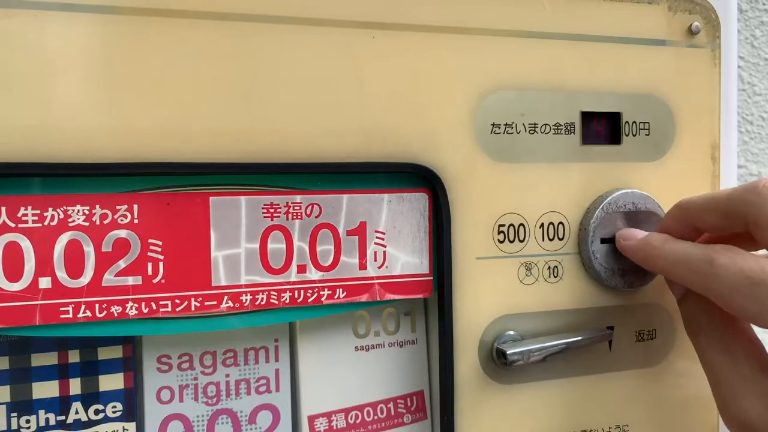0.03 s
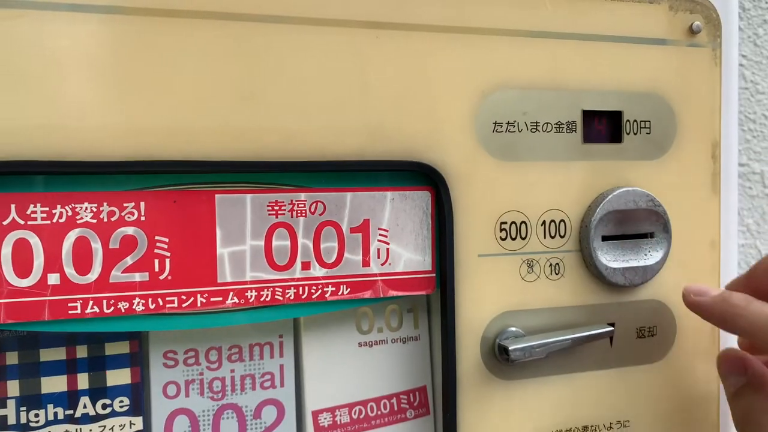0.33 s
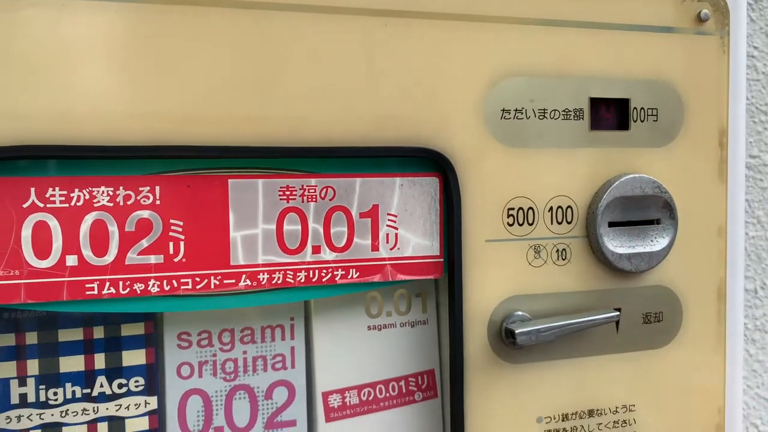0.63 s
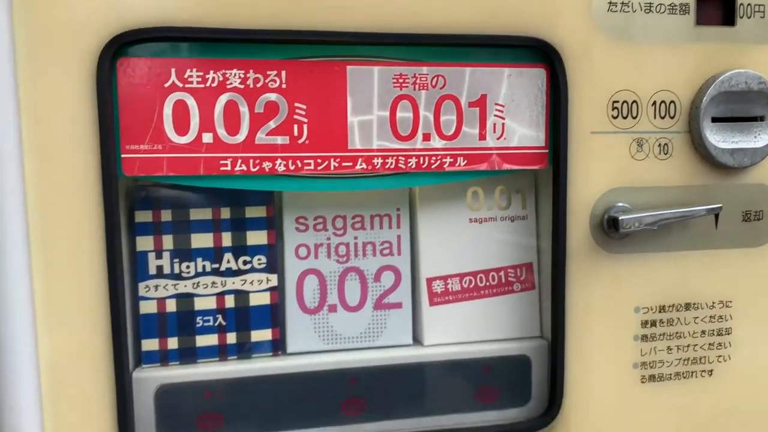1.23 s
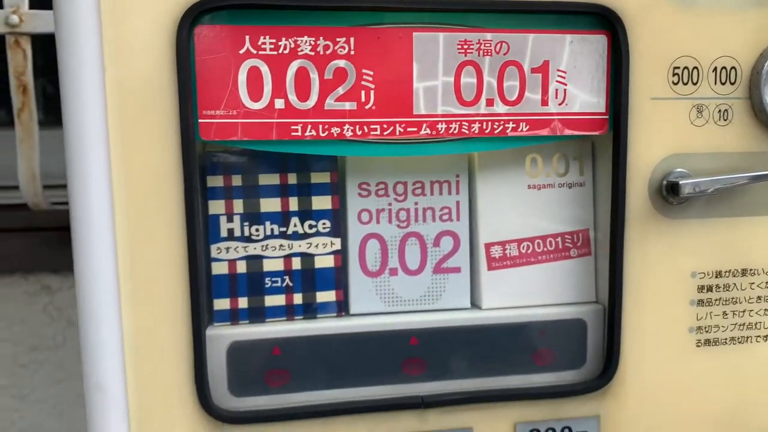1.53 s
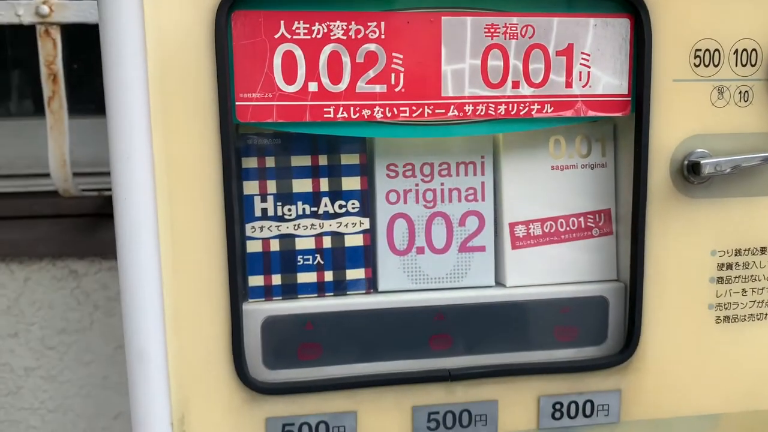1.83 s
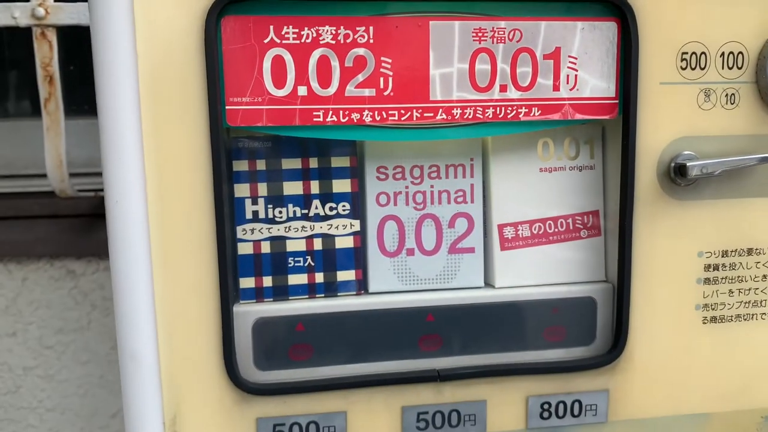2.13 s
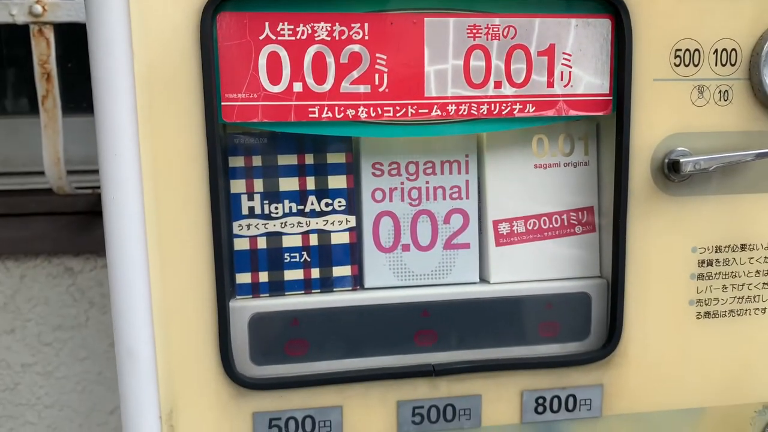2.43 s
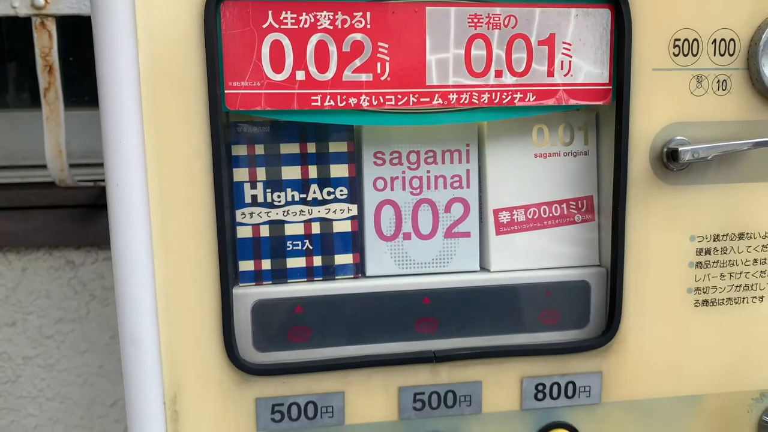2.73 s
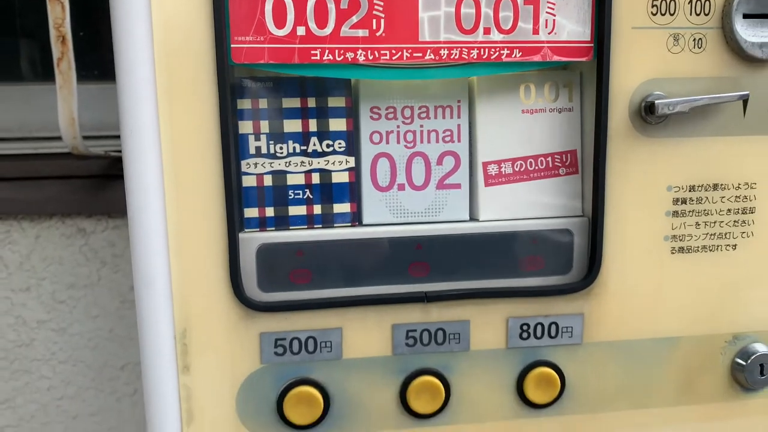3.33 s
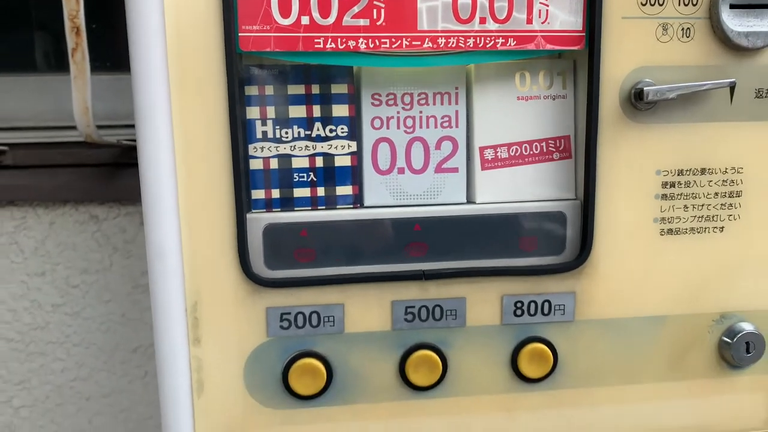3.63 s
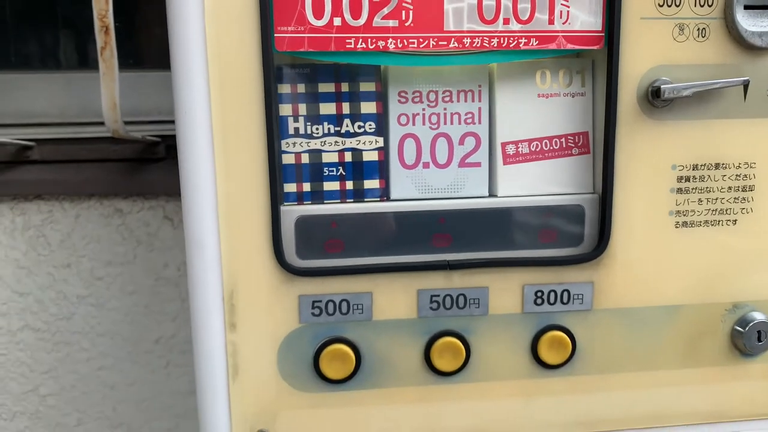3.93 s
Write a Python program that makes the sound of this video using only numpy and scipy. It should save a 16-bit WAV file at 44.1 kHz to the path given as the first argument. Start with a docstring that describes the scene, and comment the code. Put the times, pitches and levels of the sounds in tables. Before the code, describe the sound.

Close up, a coin goes into a vending machine with sharp metallic clicks, ticking, rolling and clacking down through the hollow cabinet. Once it settles, only a low rumble of faraway street traffic remains, and one faint, late scuff.

```python
"""A coin in a vending machine

A coin is pushed into the steel slot of an outdoor vending machine, close to the microphones.
It scrapes through, ticks and rolls down the chute, clacks on a gate and settles. Each contact excites
damped modes of the metal, and the sheet-metal cabinet booms and reverberates in response.
Distant traffic rumbles throughout; near the end there is one soft scuff."""
import sys
import numpy as np
from scipy import signal
from scipy.fft import rfft, irfft, next_fast_len
from scipy.io import wavfile
from scipy.ndimage import uniform_filter1d

SR = 44100
rng = np.random.default_rng(int(sys.argv[2]) if len(sys.argv) > 2 else 0)


def to_wav(s):
    """Save 16-bit WAV."""
    ch = np.atleast_2d(s).T  # columns
    pcm = np.round(np.clip(ch, -1, 1) * 32767)  # PCM
    wavfile.write(sys.argv[1], SR, pcm.astype(np.int16))


N = 176400

# Impacts of the coin on slot, chute and sorting gate: t/s, level/dB, brightness/dB, thud/dB
SLOT_IMPACTS = [(.0075, -17, -12, -21), (.016, -30, -3.5, -9.5), (.0415, -36, -1, -8), (.0655, -31, 3, -14),
                (.071, -24, 3.5, -7), (.0825, -23, 10, -3), (.086, -17.5, 8, -2), (.0985, -26, 9.5, -1.5),
                (.108, -27, 5.5, 5.5), (.1605, -31.5, 3, 8)]
CHUTE_IMPACTS = [(.184, -38, 0, 4), (.196, -34.5, -4, 0), (.251, -43.5, -5, -4), (.2935, -38, -5, -4.5),
                 (.372, -40, -18, -12), (.426, -46.5, -19, 1), (.4635, -36, -3.5, -21),
                 (.563, -26.5, 8, -7), (.6185, -49, -8, 6.5), (.624, -40, 10.5, 3), (.6425, -49.5, 1, -6),
                 (.655, -31.5, -2, -4.5), (.68, -45, 4, 1.5), (.7125, -40.5, 2.5, -22), (.727, -50, 2.5, 9),
                 (.7395, -52.5, 8.5, 5.5), (.7585, -41, 0, 4), (.7685, -37, -1.5, 0), (.841, -48.5, 7, 1),
                 (.8515, -47.5, 4.5, -0.5), (.889, -44.5, 7.5, 0), (.8985, -25.5, 5, -1),
                 (.918, -41.5, 11, -3), (.9264, -30, 5.5, -7), (.936, -39.5, 7, 9.5), (.9485, -35, 7, 4.5),
                 (.974, -44.5, 14, -10), (1.004, -53, 11, 5), (1.033, -37, 5.5, 1)]
GATE_IMPACTS = [(.798, -30.5, 16, 9.5), (.8045, -29, 14, -8.5)]
# Sliding in the slot and rolling in the chute: t/s, duration/s, level/dB
SLOT_SCRAPES = [(.01, 0.05, -45), (.083, .032, -24.5), (.115, .057, -37.5)]
CHUTE_ROLLS = [(.172, 0.039, -42.5), (.655, .135, -44.5), (.81, 0.035, -45.5), (.90, 0.071, -38.5),
               (.985, .075, -47.5)]
# Spectral envelopes of the contacts: f/Hz, relative level/dB
SLOT_SPECTRUM = [(230, -9.5), (390, 7), (510, -6), (740, 3.5), (1000, -5.5), (2100, -12.5), (2700, -7.5),
                 (5200, -6), (7100, 1), (9000, -4.5), (11000, -2), (13000, -4.5), (15400, 1.5)]
CHUTE_SPECTRUM = [(130, -1), (420, 1.5), (540, -5.5), (760, 4), (1100, -4), (3500, -1.5), (4800, -5.5),
                  (6900, -5), (8500, -7.5), (11000, -1.5), (12700, -6.5), (15400, -1.5)]
GATE_SPECTRUM = [(200, -5.5), (700, 3.5), (1300, -2.5), (3200, 5), (5000, 2), (6700, -0.5), (9700, -0.5),
                 (13000, -13.5), (15400, -9)]
# Decay times of the densely packed modes: f/Hz, T60/s
SLOT_DECAY = [(300, 0.024), (2500, 0.0744), (7000, 0.046), (15000, 0.052)]
CHUTE_DECAY = [(130, 0.24), (3000, 0.0637), (15000, 0.046)]
CABINET_DECAY = [(130, .5), (700, .25), (3000, 0.58), (7000, .4), (12000, .17)]
# Prominent modes of coin, chute plates and gate: f/Hz, relative level/dB, T60/s
COIN_MODES = [(2383, -28, .2), (6440, -30, 0.21), (7210, -25, .2), (10870, -24, 0.17), (11690, -23.5, 0.16),
              (15336, -12.5, .1)]
PLATE_MODES = [(709, -19.5, 0.1), (1314.7, -12.5, 0.059), (1650, -15, 0.082), (1880, -33, 1.0),
               (2186, -16.5, 0.12), (2893, -11.5, 0.038), (3400, -19.5, 0.094), (3737, -14, 0.053),
               (4430, -32.5, 0.44), (6430, -38.5, 0.64)]
SORTING_GATE_MODES = [(419.7, -19.5, 0.16), (724, -3, 0.05), (2910, -2.5, 0.073), (3340, -1, 0.077),
                      (3680, -3, 0.075), (6584, -15.5, 0.087)]
# Booms of the cabinet panels: t/s, level/dB
PANEL_BOOMS = [(.19, -42.5), (0.564, -43.5), (0.9, -39.5)]
# The single scuff: t/s, duration/s, level/dB
SCUFF_EVENT = [(3.704, 0.023, -46.5)]
# Spectral envelopes of scuff and traffic: f/Hz, relative level/dB
SCUFF_SPECTRUM = [(1300, 3), (2900, 3), (3700, -6), (4400, -4), (5800, -18.5), (7000, -9), (8000, -26),
                  (14800, -23)]
TRAFFIC_SPECTRUM = [(15, -51.5), (25, -26), (47, -7), (70, -5), (99, -13), (170, -18.5), (270, -16),
                    (384, -23.5), (545, -26), (695, -25.5), (1070, -35), (2550, -46), (3620, -62.5),
                    (8500, -73.5), (11000, -64.5), (14000, -87.5)]
# Envelope of an engine's drone: t/s, level/dB
DRONE_ENVELOPE = [(0, -51.5), (.8, -47), (1.6, -50), (2.2, -46), (2.8, -54.5), (3.6, -40.5), (4, -51.5)]
# Left-right coherence of the machine and of the street: f/Hz, coherence/1
NEAR_COHERENCE = [(400, 0.93), (1500, 0.49), (3300, .55), (5000, 0.067), (8000, 0.92)]
STREET_COHERENCE = [(60, 0.95), (250, 0.76), (600, 0.12), (2000, 0.16), (8000, 0.19)]

ATTACK_S, SLOT_GAIN_DB, CHUTE_GAIN_DB = 0.0006, 2.5, 3.5
THUD_HZ, BRIGHT_FROM_HZ, BRIGHT_TO_HZ = 1487, 4200, 9900
RIPPLE_DB, MODE_LINEWIDTH_HZ = 7, 14.3
ROLL_TICKS_PER_S, ROLL_SPREAD_DB = 1500, 4.5
PING_S, PING_LENGTH_S, PING_HZ, PING_DB, PING_T60 = .009, .064, 2100, -42.5, 1
BOOM_HZ, BOOM_WIDTH_HZ, BOOM_RISE_S, BOOM_T60 = 140, 84, 0.019, 1
INSIDE_TO_CABINET_DB, SLOT_TO_CABINET_DB = -15, -24.5
SCUFF_RISE_S, SCUFF_T60, SCUFF_TAIL_DB = 0.014, .085, -15.5
TRAFFIC_DB, STREET_PAN_DB, DRONE_HZ, DRONE_WIDTH_HZ = -44.5, 0.36, 69, 1.7
LEFT_LAG_S, LAG_FROM_HZ, LAG_FULL_HZ = .000175, 5100, 5407
LOW_CUT_HZ, ROLLOFF_HZ, TOP_HZ = 36, 15720, 16800


def coin():
    """Impact and friction excite slot, chute and gate, whose vibration couples into the cabinet."""
    slot_body = (SLOT_SPECTRUM, SLOT_DECAY, COIN_MODES)
    chute_body = (CHUTE_SPECTRUM, CHUTE_DECAY, PLATE_MODES)
    gate_body = (GATE_SPECTRUM, CHUTE_DECAY, SORTING_GATE_MODES)
    slot = amp(SLOT_GAIN_DB) * impacts(SLOT_IMPACTS, slot_body) + rolling(SLOT_SCRAPES, slot_body)
    slot = stereo(slot, NEAR_COHERENCE)
    chute = amp(CHUTE_GAIN_DB) * impacts(CHUTE_IMPACTS, chute_body)
    chute += rolling(CHUTE_ROLLS, chute_body, bright_db=-5.5)
    inside = stereo(chute + impacts(GATE_IMPACTS, gate_body), NEAR_COHERENCE)
    cabinet_drive = amp(INSIDE_TO_CABINET_DB) * inside + amp(SLOT_TO_CABINET_DB) * slot
    return slot + inside + slot_ping() + panel_boom() + cabinet(cabinet_drive)


def impacts(table, body):
    """Superposition: each impact excites the body anew, and the responses add."""
    out = np.zeros((2, N))
    for start, db, bright_db, thud_db in table:
        add(out, start, amp(db) * impulse_response(*body, bright_db, thud_db))
    return out


def impulse_response(spectrum, decay, modes, bright_db=0, thud_db=0):
    """Free vibration: densely packed modes merge into a clack, while a few stronger ones ring out."""
    tilt = [(THUD_HZ / 2, thud_db), (THUD_HZ * np.sqrt(2), 0),
            (BRIGHT_FROM_HZ, 0), (BRIGHT_TO_HZ, bright_db)]
    dense_modes = decaying_noise(decay)[:, :SR // 3]
    # Each point of contact favours its own resonances.
    knots_hz = np.arange(0, SR / 2, 80)
    ripple_db = RIPPLE_DB * rng.standard_normal(len(knots_hz))
    ripple = lambda hz: unit_rms(amp(np.interp(hz, knots_hz, ripple_db)))
    clack = filtered(dense_modes, lambda hz: colour(spectrum, hz) * amp(log_interp(tilt, hz)) * ripple(hz))
    t = np.arange(clack.shape[1]) / SR
    ring = np.zeros_like(clack)
    for hz, db, t60 in modes:
        envelope = amp(db + log_interp(tilt, hz) + rng.normal(0, 1.8) - 60 * t / t60)
        phase = 2 * np.pi * (hz * t + rng.random((2, 1)))
        # The moving coin makes each mode wander.
        wander = np.cumsum(rng.standard_normal(len(t))) * np.sqrt(2 * np.pi * MODE_LINEWIDTH_HZ / SR)
        ring += envelope * np.sin(phase + wander)
    return (clack + ring) * (1 - np.exp(-t / ATTACK_S))


def rolling(table, body, bright_db=0):
    """Shot noise: rolling or scraping drives the body with dense, tiny impacts of uneven size."""
    t = np.arange(N) / SR
    occurs = rng.random(N) < ROLL_TICKS_PER_S / SR
    ticks = occurs * amp(ROLL_SPREAD_DB * rng.standard_normal(N)) * rng.choice([-1, 1], N)
    contact = sum(amp(db) * ((t > start) & (t < start + length)) for start, length, db in table)
    return convolved((unit_rms(ticks) * contact)[None], impulse_response(*body, bright_db))


def slot_ping():
    """Contact damping: the slot rings with one clear tone until the entering coin stops it."""
    t = np.maximum(np.arange(N) / SR - PING_S, 0)
    window = uniform_filter1d(1. * ((t > 0) & (t < PING_LENGTH_S)), size=200)
    return np.sqrt(2) * amp(PING_DB - 60 * t / PING_T60) * window * np.sin(2 * np.pi * PING_HZ * t)


def panel_boom():
    """Panel resonance: where the coin drops, the large sheets answer with a slow, low boom."""
    t = np.arange(SR) / SR
    envelope = (1 - np.exp(-t / BOOM_RISE_S)) * amp(-60 * t / BOOM_T60)
    band = lambda hz: np.exp(-((hz - BOOM_HZ) / BOOM_WIDTH_HZ) ** 2)
    out = np.zeros(N)
    for start, db in PANEL_BOOMS:
        add(out, start, amp(db) * envelope * unit_rms(filtered(rng.standard_normal(SR), band)))
    return out


def cabinet(drive):
    """Reverberation: the hollow steel box stores energy and rings on after each excitation."""
    return convolved(drive, decaying_noise(CABINET_DECAY))


def scuff():
    """Friction noise: one dry, gritty rub, perhaps of a shoe, with a short diffuse tail."""
    start, length, db = SCUFF_EVENT[0]
    t = np.arange(N) / SR - start
    spiky_noise = rng.standard_normal((2, N)) ** 3
    grit = unit_rms(filtered(spiky_noise, lambda hz: colour(SCUFF_SPECTRUM, hz)))
    rise = np.clip(t / SCUFF_RISE_S, 0, 1) ** 2
    release = amp(db - 60 * np.maximum(t - length, 0) / SCUFF_T60)
    rub = stereo(grit * rise * release, STREET_COHERENCE)
    return rub + cabinet(amp(SCUFF_TAIL_DB) * rub)


def traffic():
    """Broadband and narrowband noise: distant traffic rumbles under an engine's wavering drone."""
    noise = filtered(rng.standard_normal((2, N)), lambda hz: amp(log_interp(TRAFFIC_SPECTRUM, hz)))
    rumble = unit_rms(stereo(noise, STREET_COHERENCE)) * amp(TRAFFIC_DB)
    peak = lambda hz: 1 / (1 + ((hz - DRONE_HZ) / DRONE_WIDTH_HZ) ** 2)
    drone = unit_rms(filtered(rng.standard_normal(N), peak))
    drone = unit_rms(drone / np.sqrt(np.abs(signal.hilbert(drone))))  # an engine swells only mildly
    drone_db = np.interp(np.arange(N) / SR, *np.transpose(DRONE_ENVELOPE))
    return (rumble + drone * amp(drone_db)) * amp([[-STREET_PAN_DB], [STREET_PAN_DB]])


def decaying_noise(decay):
    """Frequency-dependent damping: two noises in which each band decays at its own rate."""
    hz, t, bands = signal.stft(rng.standard_normal((2, SR // 2)), SR, nperseg=256)
    return signal.istft(bands * amp(-60 * t / log_interp(decay, hz)[:, None]), SR, nperseg=256)[1]


def stereo(pair, coherence):
    """Partial coherence: two independent signals, weighted as mid and side, form left and right."""
    angle = lambda hz: np.arccos(np.clip(log_interp(coherence, hz), -1, 1)) / 2
    mid, side = filtered(pair, lambda hz: np.array([np.cos(angle(hz)), np.sin(angle(hz))]))
    return np.array([mid + side, mid - side])


def convolved(drive, response):
    """Forced vibration: the drive convolved with an impulse response scaled to unit energy."""
    return signal.fftconvolve(drive, response / np.linalg.norm(response[0]), axes=1)[:, :N]


def filtered(x, response):
    """Linear filtering: the spectrum times a frequency response."""
    size = x.shape[-1]
    fft_size = next_fast_len(size + 8192)
    return irfft(rfft(x, fft_size) * response(np.fft.rfftfreq(fft_size, 1 / SR)), fft_size)[..., :size]


def colour(spectrum, hz):
    """Spectral weighting that conserves the power of white noise."""
    return unit_rms(amp(log_interp(spectrum, hz)))


def log_interp(points, hz):
    """Interpolation on a logarithmic frequency axis."""
    knots_hz, values = np.transpose(points)
    return np.interp(np.log(hz + 1), np.log(knots_hz + 1), values)


def amp(db):
    """Amplitude ratio of a level in decibels."""
    return 10 ** (np.asarray(db) / 20)


def unit_rms(x):
    """Normalisation to unit mean power."""
    return x / np.sqrt(np.mean(x ** 2) + 1e-20)


def add(track, start_s, sound):
    """Superposition of a delayed sound on a track."""
    i = max(0, round(start_s * SR))
    track[..., i:i + sound.shape[-1]] += sound[..., :N - i]


def scene():
    """Superposition: the pressures of coin, traffic and scuff add."""
    return coin() + traffic() + scuff()


def record(dry):
    """Arrival-time difference: treble reaches the left of two spaced, band-limited microphones later."""
    lag = lambda hz: np.interp(hz, [LAG_FROM_HZ, LAG_FULL_HZ], [0, LEFT_LAG_S])
    spacing = lambda hz: np.exp(np.pi * 1j * hz * lag(hz) * np.array([[-1], [1]]))
    high_cut = lambda hz: amp(-np.maximum(hz - ROLLOFF_HZ, 0) * .06) * (hz < TOP_HZ)
    low_cut = lambda hz: hz ** 2 / np.hypot(hz ** 2, LOW_CUT_HZ ** 2)
    padded = np.pad(dry, ((0, 0), (0, SR // 10)), "reflect", reflect_type="odd")
    return filtered(padded, lambda hz: spacing(hz) * high_cut(hz) * low_cut(hz))[:, :N]


dry = scene()
out = record(dry)
to_wav(out)
```